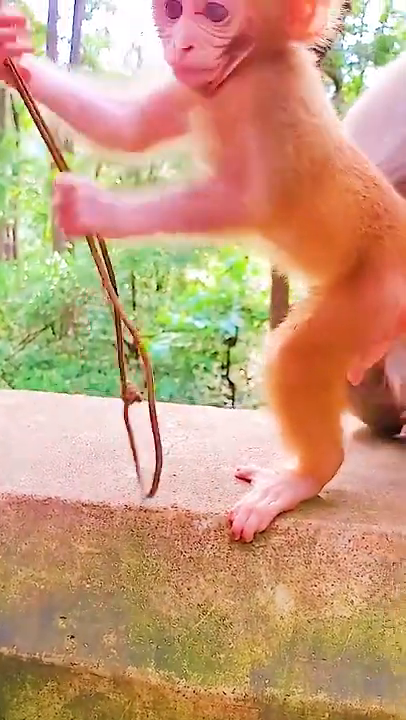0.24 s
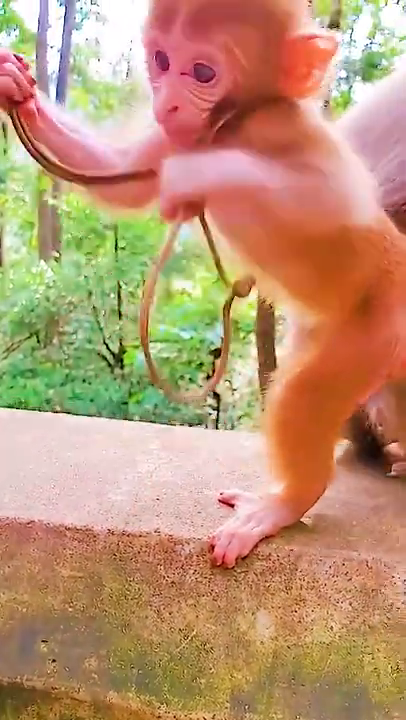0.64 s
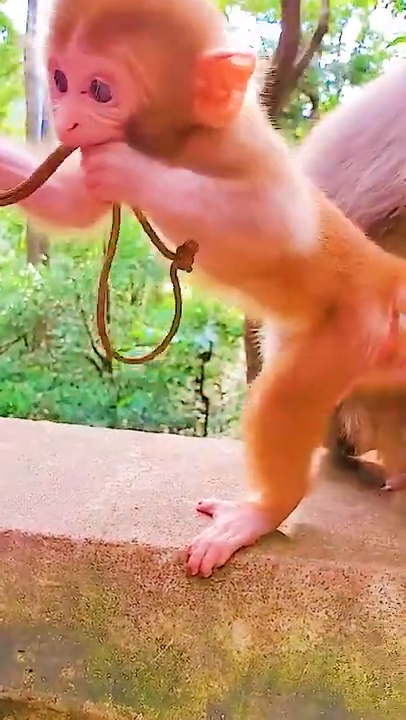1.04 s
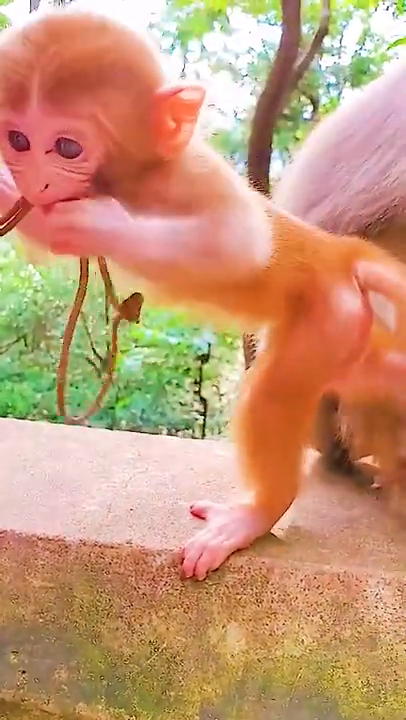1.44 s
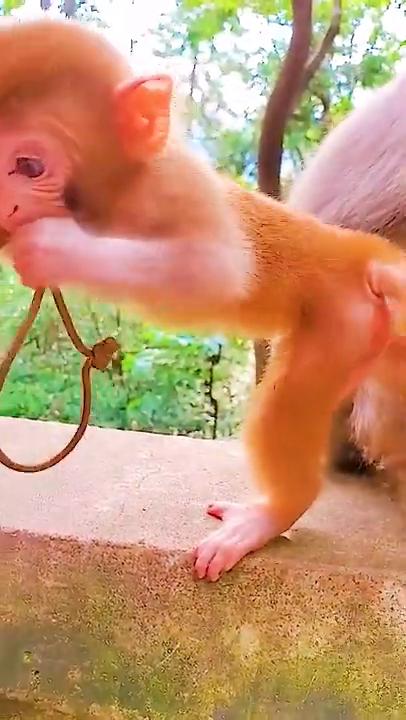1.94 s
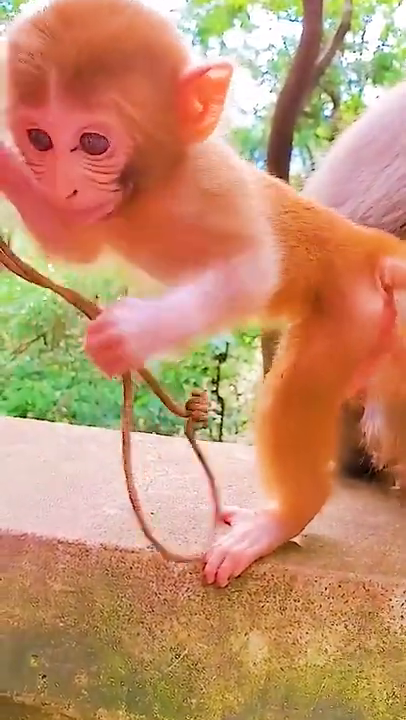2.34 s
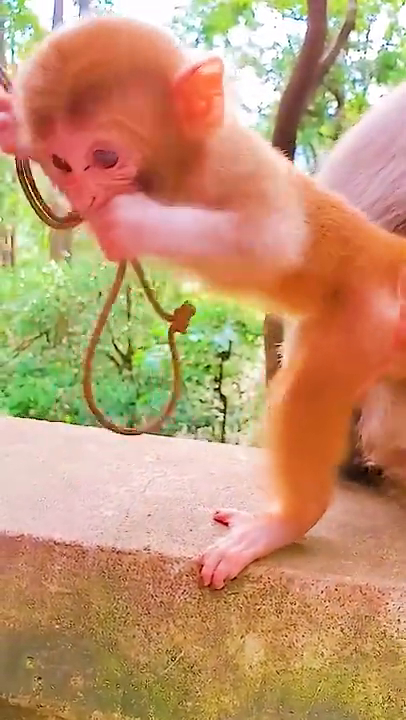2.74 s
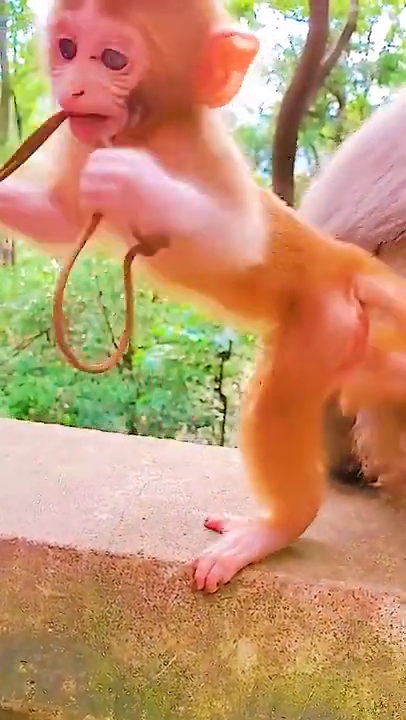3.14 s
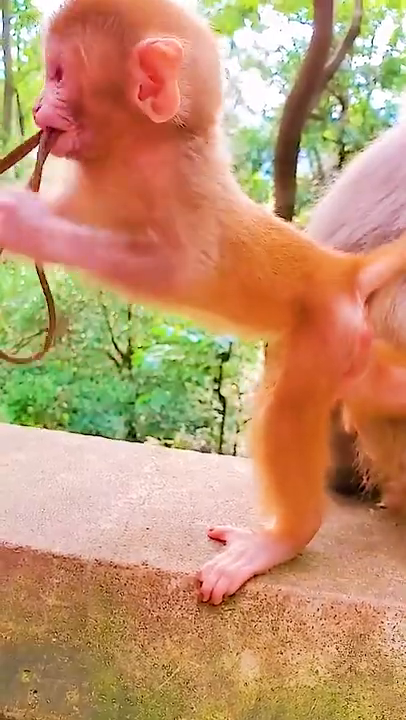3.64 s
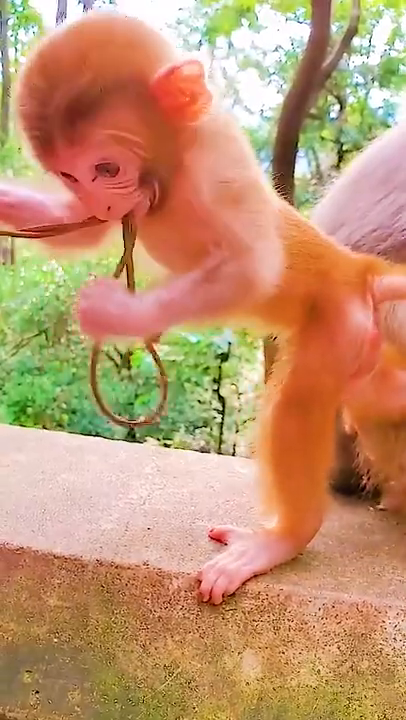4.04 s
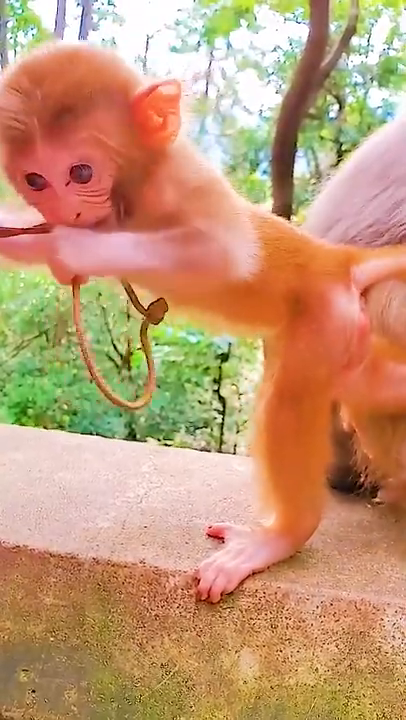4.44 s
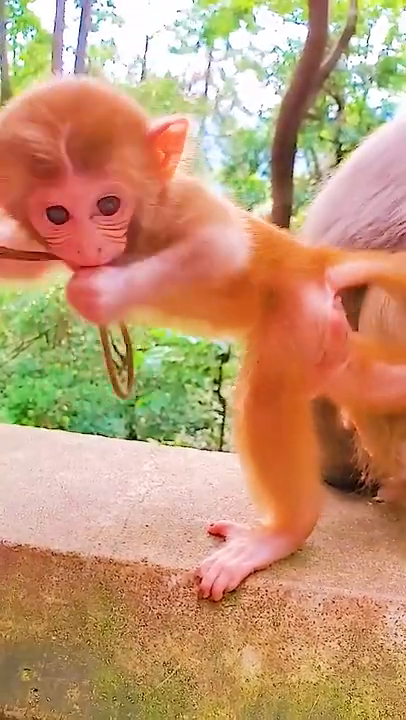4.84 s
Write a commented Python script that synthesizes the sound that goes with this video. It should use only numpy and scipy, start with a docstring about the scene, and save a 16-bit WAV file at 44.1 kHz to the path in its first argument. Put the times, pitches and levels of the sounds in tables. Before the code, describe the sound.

Piercing monkey chirps and rasping squeaks burst close on the left, thin out with small knocks and distant bird whistles, and end in overlapping coos.

```python
"""A young monkey close to the left microphone port chirps and screeches on a wall at a forest edge; at the
end two monkeys coo over each other. Voices are sums of pitch lines and breath through throat resonances.
A ringing echo after the first chirp and far birds are wavering near-sines, mostly heard as echo. Small knocks
are rings plus noise cracks; brushing fur and hands, leaf hiss and low rumble are shaped noise.
The loudest screeches are squeezed by fast gain control and overload the left channel."""
import sys
import numpy as np
from scipy import signal
from scipy.fft import rfft, irfft, next_fast_len
from scipy.io import wavfile
from scipy.ndimage import uniform_filter1d

SR = 44100
rng = np.random.default_rng(int(sys.argv[2]) if len(sys.argv) > 2 else 0)


def elevation(decibels):
    """Turn decibel levels (scalar or array-like) into linear amplitude ratios."""
    levels = np.asarray(decibels, float)
    return 10 ** (levels / 20)


def persist_wave(psi):
    """Save psi, clipped to +-1, as 16-bit WAV."""
    counts = np.round(np.clip(psi, -1, 1) * 32767).astype(np.int16)
    wavfile.write(sys.argv[1], SR, np.atleast_2d(counts).T)


N = 223926

# leaf hiss and low rumble, spectrum shape: (frequency [Hz], relative level [dB])
AIR_COLOUR = [(180, -23), (300, -5), (439, -7), (535, -7), (1000, -4.5), (1150, -5), (1370, -4), (2890, -9),
              (3300, -9), (15600, -30.5)]
RUMBLE_COLOUR = [(12, -48), (20, -31), (49, -2), (76, -5), (102, -0.5), (123, -0.5), (150, -3), (173, -14),
                 (199, -23.5), (247, -14), (350, -32), (460, -51), (770, -120)]
AIR_RMS_DB, RUMBLE_RMS_DB = -50.5, -43
# likeness of the two ports in hiss and rumble: (frequency [Hz], left-right correlation [-1..1])
PORT_LIKENESS = [(100, .993), (180, .97), (290, .7), (600, -.2), (1500, .1), (4000, 0)]
# balance of the two ports in hiss and rumble: (frequency [Hz], left minus right [dB])
PORT_BALANCE = [(60, 0.0), (240, 0.0), (950, 2.5), (3770, 6.5), (15000, 5.0)]

# fur and hands brushing: (time of peak [s], peak level [dB], rise per 20 dB [s], fall per 20 dB [s])
RUSTLES = [(.315, -38, 0.068, 0.19), (2.16, -43.5, 0.27, 0.55), (2.67, -52.5, 0.074, 0.045),
           (2.75, -49, .08, .04), (3.63, -56, .03, .06)]
# brushing, spectrum shape: (frequency [Hz], relative level [dB])
RUSTLE_COLOUR = [(1500, -31.5), (5000, -3), (9000, -5.5), (12000, -3), (16000, -4)]

# one curve a chirp: (time [s], effort [dB], pitch [Hz])
CHIRP_CURVES = [
    [(.276, -24, 3515), (.286, -32.5, 3554), (.292, -17, 3460), (.299, -25, 3107)],
    [(.404, -2.5, 3807), (.422, -15, 3910), (.435, 2.5, 3520), (.446, 3.5, 2833), (.453, -4.5, 2787),
     (.462, -21.5, 2300)],
    [(.575, 18.5, 3320), (.587, -3.5, 4040), (.615, -3.5, 3816), (.655, -18, 4286), (.685, 1, 3456),
     (.696, -0.5, 2980), (.703, -17, 2462)],
    [(.843, -7, 4020), (.86, -5, 4317), (.87, -6.5, 4250), (.877, 1.5, 3350), (.91, -3.5, 3330),
     (.93, -10.5, 3200), (.945, 8, 3005), (.958, -1, 2160), (.97, -27.5, 1936)],
    [(1.077, -39, 3426), (1.088, -13, 3306), (1.092, 4, 3330), (1.115, -3, 3300), (1.157, -4.5, 3345),
     (1.172, -33, 3620)],
    [(1.771, -24.5, 3130), (1.788, -36, 3070), (1.794, -41, 2723), (1.806, -36, 2134)],
    [(1.963, -18, 2987), (1.974, -21.5, 3206), (1.981, -20, 2900), (1.99, -31.5, 1920), (2.0, -36, 1756)],
    [(2.158, -47, 2226), (2.168, -40, 2770), (2.18, -27.5, 2946), (2.19, -29, 2550), (2.203, -20, 2370),
     (2.218, -33, 2040)],
    [(2.427, -21.5, 2907), (2.433, -37, 3065), (2.447, -40, 2490)],
    [(3.082, -22, 2296), (3.096, -33.5, 3320), (3.113, -7.5, 3612), (3.12, -11.5, 3520),
     (3.132, -13.5, 3200), (3.14, -21, 2300), (3.15, -41, 1770)],
    [(3.291, 3.5, 2586), (3.297, -19, 2834), (3.304, -12.5, 3080), (3.32, -15.5, 3183), (3.335, -9.5, 2837),
     (3.362, -22.5, 2727), (3.376, -46.5, 2100)],
    [(3.537, -39, 2315), (3.542, -23.5, 2625), (3.55, -19.5, 2684), (3.557, -24.5, 2550),
     (3.563, -16.5, 2316), (3.58, -42.5, 1955)],
    [(3.739, -14.5, 1658), (3.745, -17.5, 1946), (3.754, -18.5, 1984), (3.765, -16.5, 1630),
     (3.782, -52, 1550)],
]
# one row a chirp: (brightness at start [dB], at end [dB], widest mouth [factor on throat], shadow [share])
CHIRP_TONES = [(9.5, -11, 0.95, 0.56), (12, -12, .94, 0.5), (-8.5, -7, .95, 1.1), (21, -19, 0.91, .8),
               (-8.5, -7, 0.922, 0.528), (16.5, -9, 0.95, 1.7), (2, -14, 0.97, 0.36), (-5.5, -13, .93, .73),
               (4, -5, 0.82, 0.61), (2.5, -11.5, .94, .88), (7.5, -5, 0.9, 0.52), (6, -8, 0.84, .44),
               (7, -0.5, .73, 0.37)]
# chirp voice breaks: (from [s], to [s], half-pitch lines [0-1, squared in use], added roughness [0-1],
# added brightness [dB])
CHIRP_BREAKS = [(.4, .43, 1, 0.54, 3), (.43, .444, 0.65, 0.5, 1.5), (.444, .47, 0, 0.1, -2.5),
                (.584, .63, 0.82, 0.51, 7.5), (.63, .668, 1, 0.4, 10.5), (.668, .71, 0, 0.06, 2),
                (.868, .93, 0.3, 0.68, 5.5), (.93, .955, .1, 0.3, 8), (1.07, 1.18, 0, 0.77, 3),
                (1.788, 1.81, .1, 0.63, 0), (1.96, 1.979, .65, 0.02, 3.5), (1.979, 2.005, 0, 0.6, -0.5),
                (2.42, 2.45, 1, .4, 4), (3.116, 3.137, 1, 0.55, 7), (3.3, 3.328, .85, 0.2, -4),
                (3.328, 3.34, 0.48, .02, -5.5), (3.56, 3.585, 0.1, 0.7, 0.5), (3.748, 3.79, 0, 0.36, 2)]
# throat and mouth wide open, before the mouth factor: (centre [Hz], width at half amplitude [Hz], gain [dB])
OPEN_THROAT = [(2100, 142, -8), (3610, 484, 1.5), (4310, 1010, -1.5), (6350, 1190, -10), (9085, 1680, -7.5),
               (11390, 570, -11.5), (13020, 2640, -14), (15200, 1800, -8.5)]
# shadow over the right port for the chirping monkey, at share 1: (frequency [Hz], loss [dB])
CHIRP_SHADOW = [(60, 0), (110, -5.5), (200, 2), (380, -18), (700, 30), (1290, 5), (2380, 12.5), (4400, 29),
                (8120, 30), (15000, 55)]

# one curve a coo: (time [s], effort [dB], pitch [Hz])
COO_CURVES = [
    [(4.51, -53, 620.3), (4.53, -39, 618), (4.57, -31.5, 687.4), (4.625, -36.5, 678.3), (4.64, -28, 712.3),
     (4.7, -27.5, 724), (4.76, -25.5, 724.3), (4.772, -28, 754.4), (4.86, -24.5, 795.5), (4.89, -24, 836.6),
     (4.915, -22, 820.4), (4.968, -25, 774), (4.98, -24, 675), (4.99, -50, 670)],
    [(4.69, -41, 527.7), (4.705, -38, 583.4), (4.725, -35, 622.4), (4.8, -36.5, 648.7), (4.9, -35.5, 651),
     (4.99, -31, 666), (5.03, -32, 635), (5.052, -37.5, 605), (5.062, -82, 598)],
]
# one row a coo: (brightness at start [dB], at end [dB], widest mouth [factor on throat], shadow [share])
COO_TONES = [(5, -2.5, 0.923, 1.0), (-1.5, 6, .9, 0.58)]
# one list a coo, voice breaks, none in the second: (from [s], to [s], third-pitch lines [0-1, squared in use],
# added roughness [0-1], added brightness [dB])
COO_BREAKS = [
    [(4.55, 4.625, 0.2, .02, -2), (4.635, 4.74, 0.52, 0, -3), (4.91, 4.985, 0.78, 0.18, -1)],
    [],
]
# one list a coo, rounded throat before the mouth factor:
# (centre [Hz], width at half amplitude [Hz], gain [dB])
ROUND_THROATS = [
    [(822, 206, 3), (1228, 134, 4.5), (1630, 246, 3), (2300, 293, 4.5), (3900, 200, -1), (6200, 570, -13),
     (8150, 360, -13), (10510, 1080, -4)],
    [(740, 540, 7), (1500, 1200, -13), (2900, 600, 4.5), (4620, 1500, 0), (6700, 280, -11), (9380, 730, -7),
     (12300, 690, -5), (14040, 700, -19.5)],
]
# shadow over the right port for the cooing monkeys, at share 1: (frequency [Hz], loss [dB])
COO_SHADOW = [(60, 0.0), (110, 0.0), (200, -14), (380, 7), (700, 14.5), (1290, -9.5), (2380, -1),
              (4400, 27), (8120, 33), (15000, 7)]

ATTACK_S, ATTACK_DB, RELEASE_S = 0.0035, 35.5, 0.0022  # onset and stop of the folds, depth of both ramps
SHUT_BELOW_DB = 32  # mouth at its smallest this far below the call's loudest effort

# echo of the trees, a pair of lists: (frequency [Hz], t60 [s]) and (frequency [Hz], relative level [dB])
FOREST = [(300, 0.58), (1500, 0.95), (3000, 0.99), (5000, 1.05), (9000, 0.61), (15000, 0.66)], [(500, 0),
          (2500, -6), (4000, -6), (7000, 1), (15000, -5.5)]
# echo of the wall close by, a pair of lists: (frequency [Hz], t60 [s]) and (frequency [Hz], relative level [dB])
WALL = [(1000, 0.14), (5000, 0.059), (15000, 0.083)], [(1500, -12), (3500, 0), (8000, 9), (15000, -35.5)]

# steady notes, a ringing echo after the first chirp, then far birds:
# (start [s], length [s], source level [dB], pitch [Hz])
STEADY_NOTES = [(0.294, 0.35, -36, 3144), (.72, 0.15, -50, 1517), (1.297, 0.31, -55, 1065),
                (1.27, 0.24, -58, 2120), (2.718, 0.077, -51.5, 2034), (3.82, 0.1, -61.5, 5400),
                (4.053, .42, -53.5, 1057)]
# far birds, falling whistles: (start [s], length [s], source level [dB], first pitch [Hz], last pitch [Hz],
# bend [exponent, under 1 falls fastest at first])
BIRD_GLIDES = [(2.032, .37, -37.5, 4740, 2790, 1.17), (3.669, .025, -35, 4530, 3930, 1.05),
               (3.698, .38, -33, 3547, 2199, 1.05), (3.942, 0.14, -37.5, 2100, 1440, 1.4)]
# swell of notes and of glides: (loudest point [share of length], start below it [dB], end below it [dB])
NOTE_SWELL = (.2, 4.8, 11.5)
GLIDE_SWELL = (0.38, 17, 9.1)

# small knocks and ticks nearby: (start [s], ring level [dB peak], first ring pitch [Hz], ring t60 [s],
# crack level [dB])
KNOCKS = [(0.489, -41, 300, 0.23, -49), (0.508, -33.5, 306, 0.2, -59.5), (1.681, -56.5, 900, .02, -45.5),
          (2.631, -21.5, 909, 0.036, -28), (3.05, -41.5, 856, 0.062, -50.5), (3.279, -41, 910, 0.023, -37),
          (3.619, -62.5, 875, 0.022, -41), (3.93, -36.5, 710, 0.071, -41)]


def evened(x):
    """Scales to rms 1."""
    return x / np.sqrt(np.mean(x ** 2) + 1e-20)


def smooth_noise(noise, size):
    """Noise averaged twice over size samples, rms 1."""
    return evened(uniform_filter1d(uniform_filter1d(noise, size=size), size=size))


def read(points, hz):
    """Reads a spectrum table on a log-frequency axis."""
    f, value = np.transpose(points)
    return np.interp(np.log(hz + 1), np.log(f + 1), value)


def coloured(x, points, scale=1):
    """Filters x by a (Hz, dB) table times scale."""
    length = x.shape[-1]
    size = next_fast_len(length)
    gain = elevation(scale * read(points, np.fft.rfftfreq(size, 1 / SR)))
    return irfft(rfft(x, size) * gain, size)[..., :length]


def columns(rows):
    """Interpolates a control table to samples."""
    s, *rest = np.transpose(rows)
    t = np.arange(s[0], s[-1], 1 / SR)
    return [np.interp(t, s, c) for c in rest]


def add(mix, start_s, sound):
    """Mixes a sound in at start_s."""
    part = mix[round(start_s * SR):][:len(sound)]
    part += sound[:len(part)]


def ports(x, shadow, share, lag):
    """Left port hears x directly; the right one later, duller and through two nearby reflections."""
    right = np.roll(x, int(lag))  # lag in samples
    right = right - 0.16 * np.roll(x, int(3 * lag + 1)) + 0.58 * np.roll(x, int(11 * lag))
    return np.array([x, coloured(right, shadow, -share) / 2.2])


def air(colour, rms_db):
    """Hiss or rumble: noise nearly the same in both ports in the bass, mostly unrelated above."""
    frames, hz = N // 512 + 5, np.fft.rfftfreq(2048, 1 / SR)
    a, b, c, d, patches = rng.standard_normal((frames, 1025, 5)).T
    patches_db = evened(uniform_filter1d(uniform_filter1d(patches, size=20, axis=0), size=8, axis=1))
    same = np.clip(read(PORT_LIKENESS, hz), -1, 1)[:, None]
    left = a + 1j * b
    right = same * left + np.sqrt(1 - same ** 2) * (c + 1j * d)
    lean_db = read(PORT_BALANCE, hz)[:, None] / 2
    gain_db = read(colour, hz)[:, None] + patches_db
    z = np.array([left, right]) * elevation(gain_db + np.array([lean_db, -lean_db]))
    return elevation(rms_db) * evened(signal.istft(z, nperseg=2048, noverlap=1536)[1][:, :N])


def rustle():
    """Brushing fur and hands: grainy treble noise under each movement."""
    grain_db = 2.06 * evened(uniform_filter1d(rng.standard_normal(N), size=60))
    grains = rng.standard_normal(N) * elevation(grain_db)
    t = np.arange(N) / SR
    level = sum(elevation(db - 20 * np.maximum((s - t) / rise, (t - s) / fall)) for s, db, rise, fall in RUSTLES)
    return level * evened(coloured(grains, RUSTLE_COLOUR))


def controls(curve, tone, breaks, clear, frayed, snap, slip_s, shut, follow, ease_db):
    """Effort and pitch, with the breaks, fraying end, brightness and mouth opening of one call."""
    effort_db, hz = columns(curve)
    t = np.arange(len(hz)) / SR
    u, below_db = t / t[-1], effort_db.max() - effort_db
    sub = np.zeros(len(t))
    rough = clear + frayed * u ** 8 + snap * np.exp(-t / ATTACK_S)  # the folds snap apart noisily
    bright_db = tone[0] + (tone[1] - tone[0]) * u
    bright_db = bright_db + ease_db * np.minimum(below_db / 20, 1)  # tilt of a voice held back
    now_s = t + curve[0][0]
    for start, end, lines, tear, gain_db in breaks:
        broken = np.clip(np.minimum(now_s - start, end - now_s) / slip_s + .5, 0, 1)
        sub = sub + lines * broken
        rough = rough + tear * broken
        bright_db = bright_db + gain_db * broken
    mouth = tone[2] * (hz / hz.max()) ** follow * (1 - shut * np.minimum(below_db / SHUT_BELOW_DB, 1))
    edges_db = ATTACK_DB * np.maximum(np.maximum(1 - t / ATTACK_S, 1 - (t[-1] - t) / RELEASE_S), 0)
    return effort_db - edges_db, hz, sub, rough, bright_db, mouth


def resonate(x, hz, width):
    """Shifts the curve hz down to zero, smooths twice and shifts back: a steep moving resonance."""
    turn, r = np.exp(2j * np.pi * np.cumsum(hz) / SR), np.exp(-np.pi * width / SR)
    return 2 * (turn * signal.lfilter([(1 - r) ** 2], [1, -2 * r, r * r], x / turn)).real


def voice(control, throat, order, jitter, split_hz, tear_hz, hiss_db):
    """Folds repeating every order-th beat; roughness tears lines into bands and lets hiss ring the throat."""
    effort_db, hz, sub, rough, bright_db, mouth = control
    hz = uniform_filter1d(hz, size=200, mode="nearest")
    sub, rough = np.clip(sub, 0, 1.2) ** 2, np.clip(rough, 0, 1)
    shake, hiss, flutter = rng.standard_normal((len(hz), 3)).T
    shake = smooth_noise(shake, 60)
    turns = np.cumsum(hz * (1 + jitter * rough * shake)) / SR / order
    k = np.arange(1, int(16000 * order / hz.min()) + 1)[:, None]
    line_hz = k * hz / order

    def lift_db(f):
        """A pressed voice shifts energy upwards."""
        return bright_db * np.tanh((f - split_hz) / 800)

    rings = sum(elevation(db) / (1 + (2 * (line_hz - f * mouth) / w) ** 2) for f, w, db in throat)
    lines = rings * elevation(lift_db(line_hz)) * np.where(k % order, sub, 1) * (line_hz < 16000)
    lines *= np.where(k < order, .25, 1)  # a small mouth hardly radiates below the pitch

    torn = smooth_noise(rng.standard_normal((2, len(k), len(hz))), 40)
    share = np.clip(rough * (line_hz / tear_hz) ** 1.5, 0, 1)  # upper lines tear first
    angle = 2 * np.pi * k * turns + 0.72 * k ** 2 / order
    band = (torn[0] * np.cos(angle) + torn[1] * np.sin(angle)) / np.sqrt(2)
    waves = np.sqrt(1 - share ** 2) * np.cos(angle) + share * band
    tone = np.sqrt(2) * (lines * waves).sum(0) / np.sqrt((lines ** 2).sum(0))

    gains = [elevation(db + lift_db(f * mouth)) for f, w, db in throat]
    breath = sum(g * resonate(hiss, f * mouth, w) for g, (f, w, db) in zip(gains, throat))
    breath /= np.sqrt(sum(g ** 2 * np.pi * w / SR for g, (f, w, db) in zip(gains, throat)))
    airy = np.clip(elevation(hiss_db) * rough, 0, 1)
    # chaotic folds beat unevenly
    bursts = elevation(0.77 * rough * evened(uniform_filter1d(flutter, size=100)))
    return elevation(effort_db) * bursts * (np.sqrt(1 - airy ** 2) * tone + airy * breath)


def calls(curves, tones, breaks, throats, manner, shadow, lag, **folds):
    """Lays out every call of one kind in both ports."""
    out = np.zeros((2, N))
    for curve, tone, gaps, throat in zip(curves, tones, breaks, throats):
        sound = voice(controls(curve, tone, gaps, **manner), throat, **folds)
        add(out.T, curve[0][0], ports(np.pad(sound, (0, 400)), shadow, tone[3], lag).T)
    return out


def chirps():
    """Chirps and screeches: open throat, half-pitch breaks, noisy onsets and fraying ends."""
    count = len(CHIRP_CURVES)
    manner = dict(clear=.03, frayed=0.35, snap=.6, slip_s=.006, shut=.08, follow=0.088, ease_db=4.0)
    return calls(CHIRP_CURVES, CHIRP_TONES, [CHIRP_BREAKS] * count, [OPEN_THROAT] * count, manner,
                 CHIRP_SHADOW, lag=6, order=2, jitter=.05, split_hz=3770, tear_hz=3200, hiss_db=-1.0)


def echo(x, t60, colour, gap_s):
    """Scattered sound coming back: sparse taps, each band dying at its own speed."""
    taps, starts = np.zeros((2, SR)), np.arange(round(gap_s * SR), SR - 20, 20)
    shape = (2, len(starts))
    places = starts + rng.integers(0, 20, shape)
    np.put_along_axis(taps, places, rng.choice([-1., 1.], shape), 1)
    hz, t, z = signal.stft(taps, SR, nperseg=256)
    decay_db = read(colour, hz)[:, None] - 60 * t / read(t60, hz)[:, None]
    tail = signal.istft(z * elevation(decay_db), SR, nperseg=256)[1]
    return signal.fftconvolve(x[None], tail / np.linalg.norm(tail[0]), axes=1)[:, :N]


def whistle(swell, length_s, db, first_hz, last_hz, bend):
    """A near-sine that swells, fades and wavers a little."""
    u = np.arange(0, length_s, 1 / SR) / length_s
    top, rise_db, fall_db = swell
    hz = first_hz + (last_hz - first_hz) * u ** bend
    waver = evened(uniform_filter1d(rng.standard_normal(len(u)), size=400))
    level = elevation(db - np.interp(u, [0, top, 1], [rise_db, 0, fall_db]))
    return np.sqrt(2) * level * np.sin(2 * np.pi * np.cumsum(hz * (1 + 0.0064 * waver)) / SR)


def ring_and_birds():
    """Steady notes (a ringing echo after the first chirp, then far birds) and the birds' falling whistles."""
    out = np.zeros(N)
    for s, length_s, db, hz in STEADY_NOTES:
        add(out, s, whistle(NOTE_SWELL, length_s, db, hz, hz, 1))
    for s, *glide in BIRD_GLIDES:
        add(out, s, whistle(GLIDE_SWELL, *glide))
    return out


def knocks():
    """A short noise crack and one dull ring whose pitch sags."""
    out, t = np.zeros(N), np.arange(6000) / SR
    for s, db, hz, t60, crack_db in KNOCKS:
        sag = 1 - 0.2 * np.minimum(t / t60, 2)
        ring = elevation(db - 60 * t / t60) * np.sin(2 * np.pi * hz * t * sag)
        ring *= np.minimum(t / 0.00095, 1)
        crack = elevation(crack_db - 60 * t / 0.049) * rng.standard_normal(len(t))
        add(out, s, ring + crack)
    return out


def coos():
    """Two overlapping coos, rounded, gentle onsets; the first breaks to third-pitch lines, the second is plain."""
    manner = dict(clear=0.078, frayed=.02, snap=.05, slip_s=0.033, shut=.1, follow=0.22, ease_db=-0.5)
    return calls(COO_CURVES, COO_TONES, COO_BREAKS, ROUND_THROATS, manner,
                 COO_SHADOW, lag=1, order=3, jitter=.03, split_hz=3000, tear_hz=2400, hiss_db=3.0)


def scene():
    """Near monkeys are dry and left; the ring and the birds arrive mostly as echo."""
    near = chirps() + coos() + ports(knocks() + rustle(), CHIRP_SHADOW, 0.27, lag=1.2)
    far = ring_and_birds()
    # gains per port: [[left dB], [right dB]]
    echoes = elevation([[-30], [-35]]) * echo(near[0], *FOREST, gap_s=0.023)
    echoes += elevation([[-29], [-40]]) * echo(near[0], *WALL, gap_s=0.0042)
    echoes += elevation([[4], [0]]) * echo(far, *FOREST, gap_s=0.0056)
    background = air(RUMBLE_COLOUR, RUMBLE_RMS_DB) + air(AIR_COLOUR, AIR_RMS_DB)
    return near + far * elevation([[-6], [-12]]) + echoes + background


def low_pass(x):
    """Removes everything above the highest recorded frequency."""
    return signal.sosfilt(signal.butter(12, 15790, fs=SR, output="sos"), x)


def record(dry):
    """Fast gain control squeezes both ports by the louder one; what slips through clips."""
    threshold_db, recovery_db_per_s, squeeze = -7.5, 505.0, 0.76  # squeeze: dB cut per dB over
    power = abs(uniform_filter1d((dry ** 2).max(0), size=150))
    power_db = 10 * np.log10(power + 1e-12)
    fall_db = np.arange(N) * recovery_db_per_s / SR
    held_db = np.maximum.accumulate(power_db + fall_db) - fall_db
    over_db = np.maximum(held_db - threshold_db, 0)
    ducked = dry / elevation(squeeze * uniform_filter1d(over_db, size=60))
    return low_pass(np.clip(ducked, -1, 1))


dry = scene()
out = record(dry)
persist_wave(out)
```